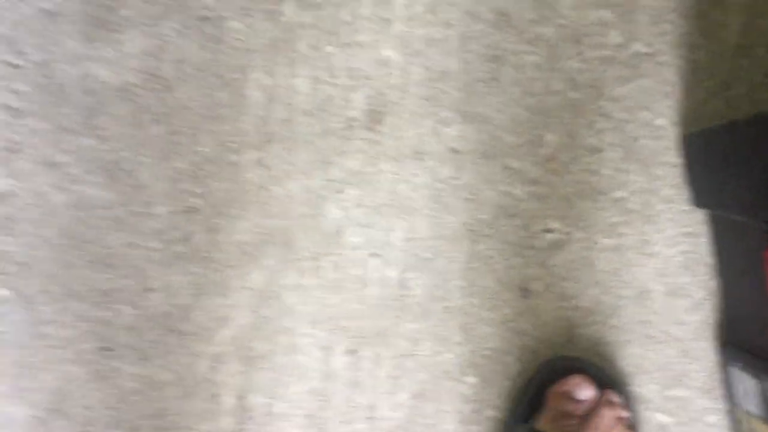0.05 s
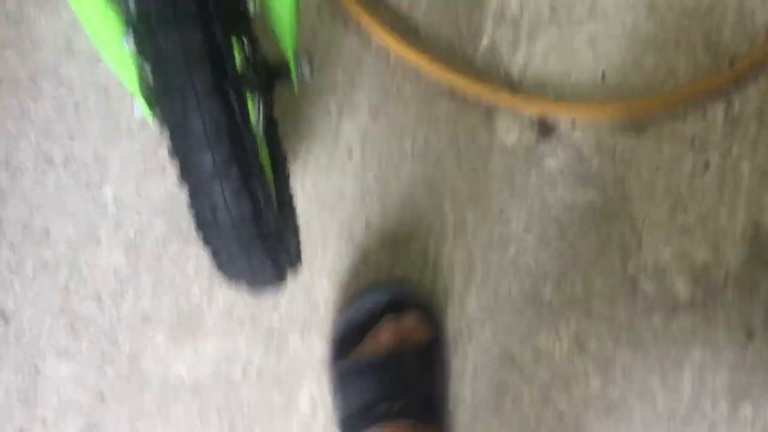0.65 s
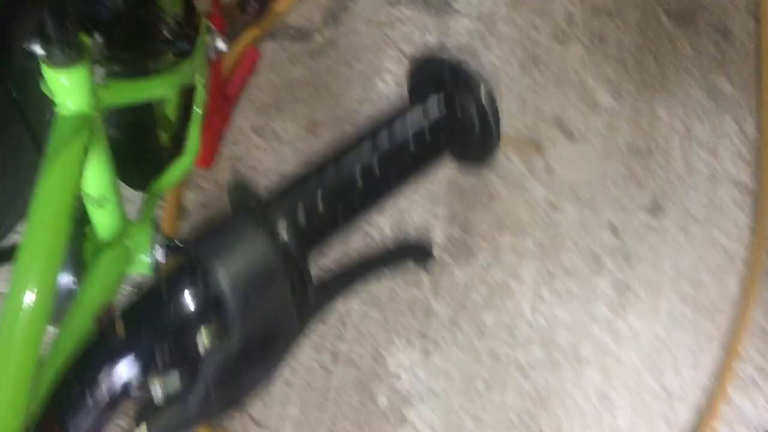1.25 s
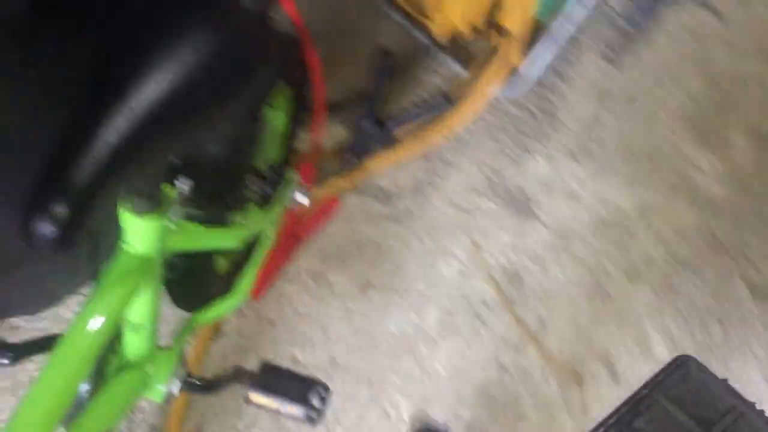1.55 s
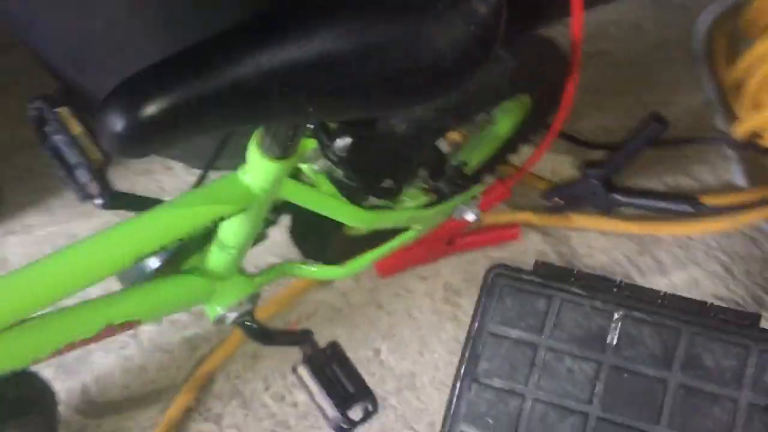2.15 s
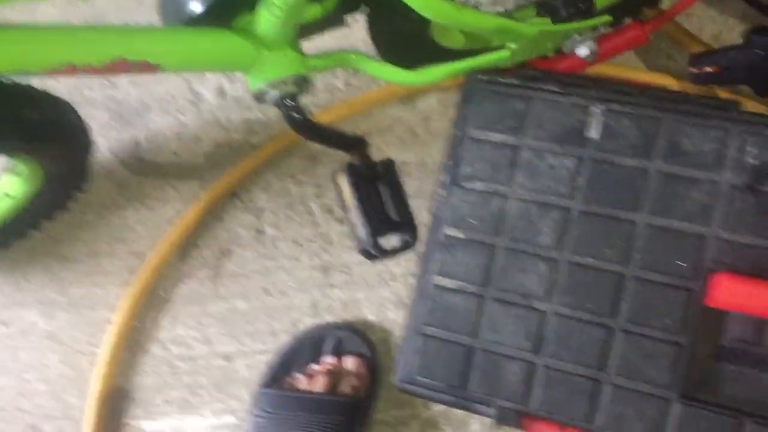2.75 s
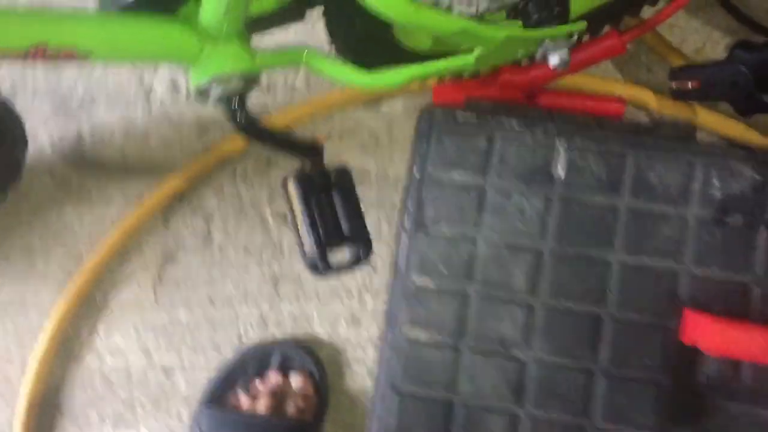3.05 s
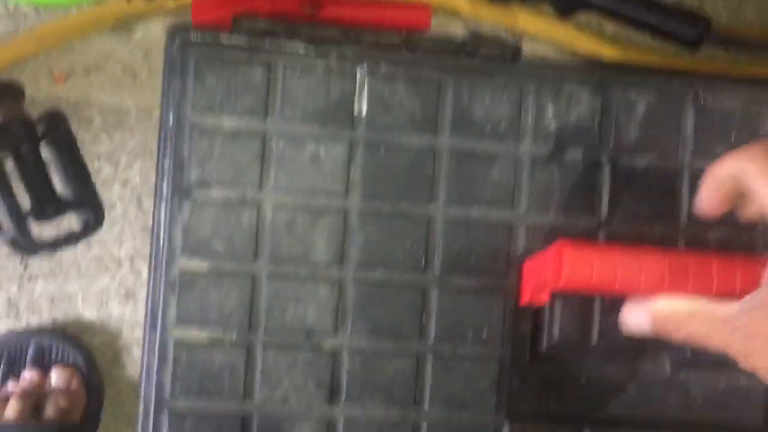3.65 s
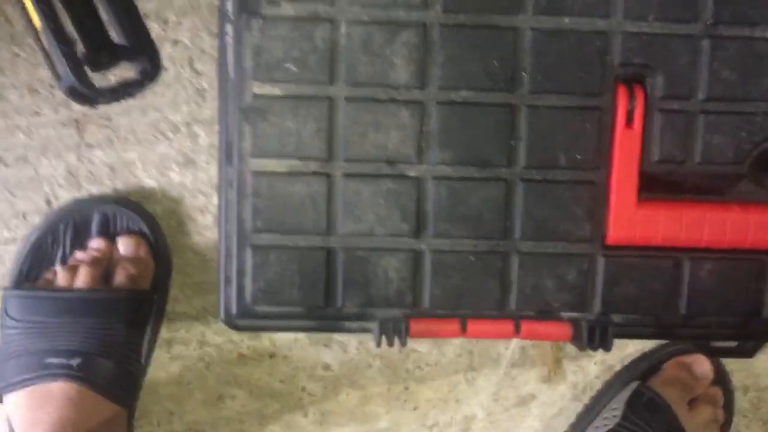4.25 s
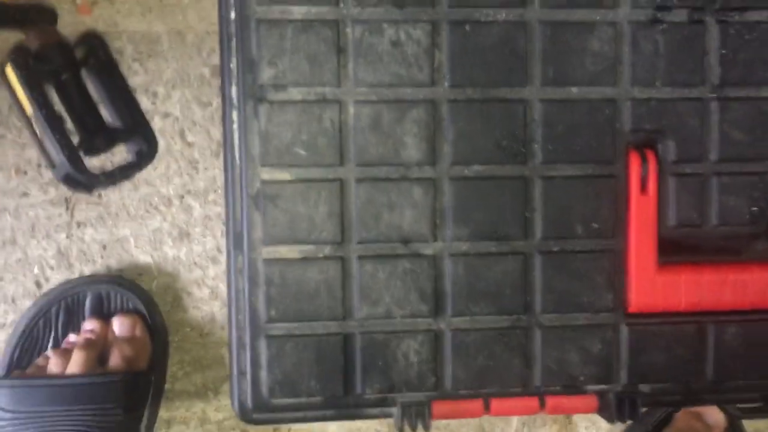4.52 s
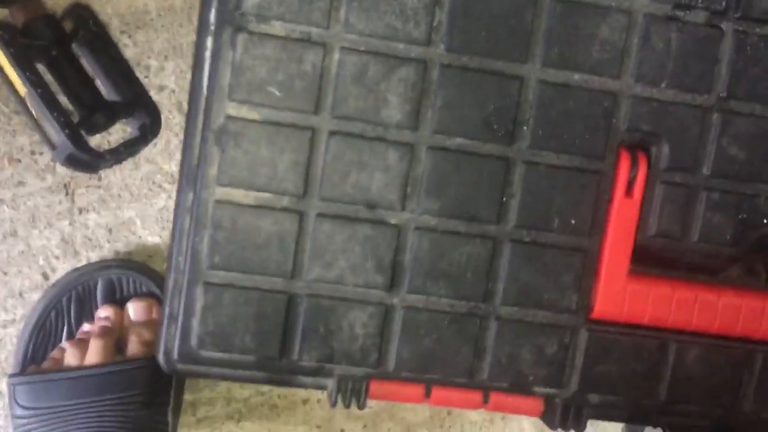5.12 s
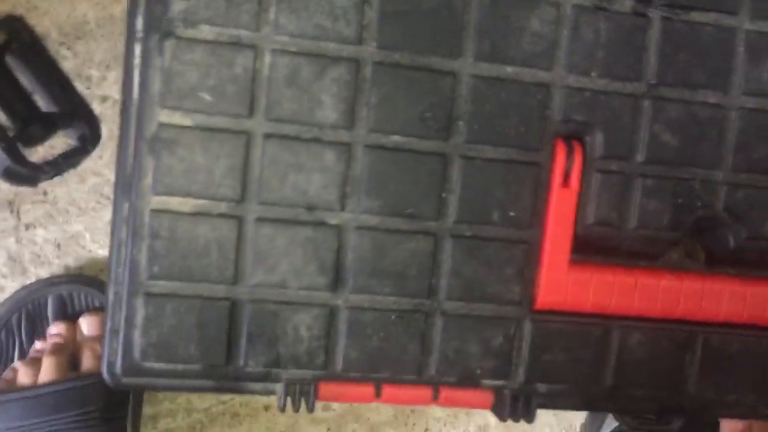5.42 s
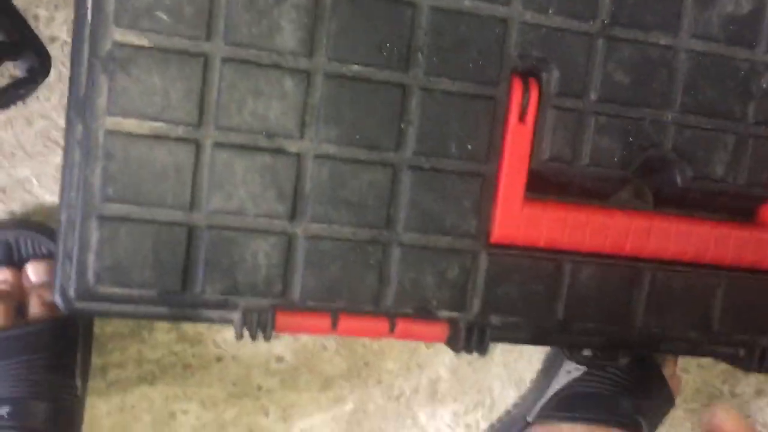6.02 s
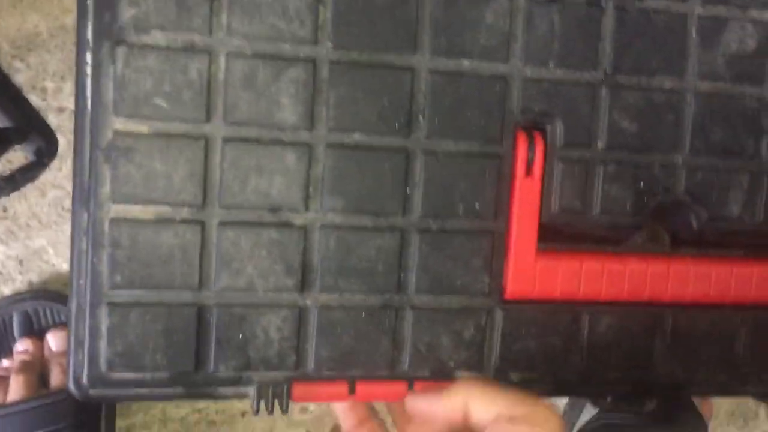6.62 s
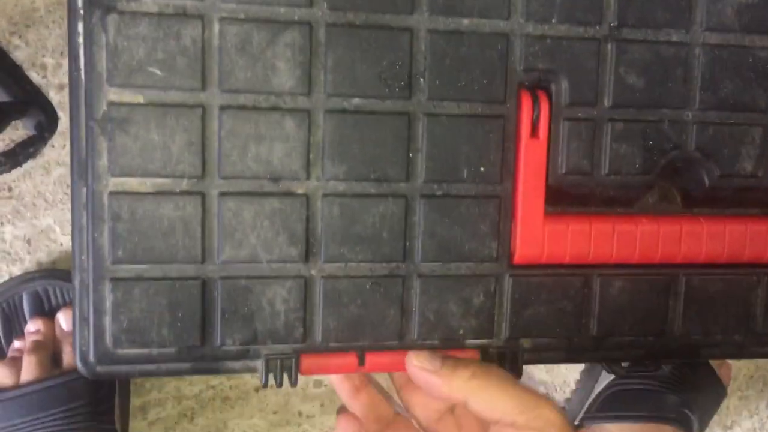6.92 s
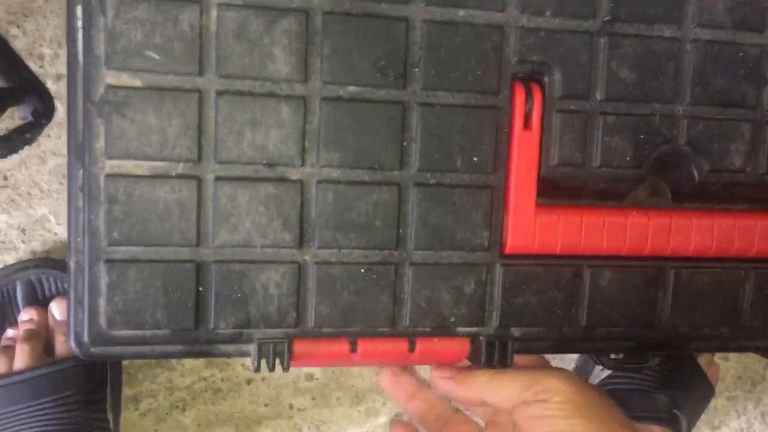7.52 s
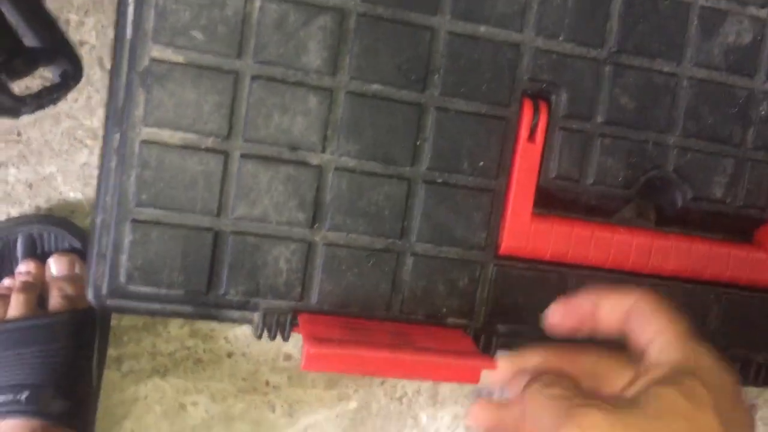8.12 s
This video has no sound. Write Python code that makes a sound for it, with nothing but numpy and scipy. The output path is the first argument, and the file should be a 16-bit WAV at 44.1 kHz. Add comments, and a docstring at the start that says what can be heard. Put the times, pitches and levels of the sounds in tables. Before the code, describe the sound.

Hollow knocks, scrapes and sharp clicks as a plastic box is shifted and its latch snapped, over a low garage hum.

```python
"""A plastic box holding a car battery is shifted on a garage floor; its handle drops and its latches snap.
Each impact excites the modes of the hollow shell and the reverberation of the small room; heavy ones also
thud on the floor and may shove the box. Hands and plastic rub, the shell creaks by stick-slip friction,
plastic squeaks briefly and lid panels pop. At first, sandals scuff across the concrete towards the box.
Underneath lie a low machine hum, a soft rumble and rustle, and the steady air of the garage."""
import sys
import numpy as np
from scipy import signal
from scipy.fft import rfft, irfft, next_fast_len
from scipy.io import wavfile
from scipy.ndimage import uniform_filter1d

SR = 44100
rng = np.random.default_rng(int(sys.argv[2]) if len(sys.argv) > 2 else 0)


def output_pcm(signal):
    """Save a mono or channel-first signal as 16-bit PCM at the path in sys.argv[1].

    Samples are clipped to [-1, 1] before scaling.
    """
    pcm = np.clip(np.atleast_2d(signal).T, -1, 1) * 32767
    wavfile.write(sys.argv[1], SR, np.round(pcm).astype(np.int16))


N = 369116
TIME = np.arange(N) / SR
AGE = np.arange(int(.4 * SR)) / SR  # time since an impact, s
ATTACK = int(.016 * SR)  # opening samples, which set the level of an impact

# The four registers of a contact, thump, body, clack and crisp edge: lower f/Hz, upper f/Hz.
# A contact's level is that of its thump; hardness is clack over thump, sharpness is edge over clack.
REGISTERS = [(90, 480), (480, 1050), (1050, 2600), (2600, 15500)]
# Hard blows on box, handle and latches: t/s, level/dB, hardness/dB, sharpness/dB
KNOCKS = [(2.771, -36.5, -12, -19), (2.945, -50.5, -10, -15), (3.021, -12.5, -13.5, -5),
          (3.067, -21, -20.5, -8.5), (3.304, -31, 3, -29), (3.317, -7, -3.5, -5), (3.4, -15.5, -7.5, -7.5),
          (3.441, -23, 2, -23.5), (3.552, -34, -19.5, 2.5), (3.59, -29.5, -15.5, -13.5),
          (3.993, -12, 2, -6.5), (4.066, -21.5, -1, -8.5), (4.325, -39, -12, -7), (4.354, -28, -16, -5.5),
          (5, -19.5, -18.5, -12.5), (5.014, -17, -8, -17), (5.06, -21, -13, -25), (5.565, -50, 5.5, -6.5),
          (5.603, -39, -0.5, -14), (5.757, -36.5, 2.5, -5), (5.767, -10.5, -13.5, -6),
          (5.828, -20, -16, -16.5), (6.041, -37.5, -13.5, 6), (6.057, -32.5, -9, -7.5),
          (6.268, -34, -0.5, -6), (6.359, -46, 4, -1.5), (6.395, -23.5, -11, -6.5),
          (6.725, -34.5, -11, -17.5), (6.761, -25, -30, -4.5), (6.777, -39.5, 15, -12),
          (6.944, -49.5, -4.5, 2), (7.103, -44.5, -1, -29.5), (7.169, -13.5, -8.5, -9.5),
          (7.564, -42.5, -13, -6.5), (7.718, -37.5, -8, -1), (8.053, -36.5, -1.5, -15),
          (8.083, -22, -18, -26.5), (8.105, -23.5, -13.5, -28)]
# Spectrum of a hard contact: f/Hz, relative level/dB
CONTACT_SPECTRUM = [(80, -8.5), (150, 9.5), (380, -4.5), (520, -16.5), (800, -15), (1600, 10), (2600, -5),
                    (4200, -2.5), (6500, -8), (9000, -11.5), (15000, -20.5)]
# Spectrum of sliding friction: f/Hz, relative level/dB
FRICTION_SPECTRUM = [(80, 7), (150, 15), (330, 7), (520, -12.5), (900, -8), (1550, 0.5), (2600, -7.5),
                     (4200, -8), (6400, -10.5), (8500, -17.5), (15000, -21.5)]


def undb(db):
    """Amplitude ratio of a level in decibels."""
    return 10 ** (np.asarray(db) / 20)


def unit(x, size=None):
    """Normalisation to rms 1, over the first samples if a size is given."""
    return x / np.sqrt(np.mean(x[:size] ** 2) + 1e-18)


def band(x, lo_hz, hi_hz, order=3):
    """Causal band-pass filter."""
    return signal.sosfilt(signal.butter(order, [lo_hz, hi_hz], "band", fs=SR, output="sos"), x)


def noise(spectrum, size):
    """Spectral shaping of white noise by rows of f/Hz, level/dB; the result has rms 1."""
    hz, db = np.transpose(spectrum)
    n = next_fast_len(size)
    bin_hz = np.arange(n // 2 + 1) * SR / n
    gain = undb(np.interp(np.log(bin_hz + 1), np.log(hz), db))
    return unit(irfft(rfft(rng.standard_normal(n)) * gain, n)[:size])


def wander(rate_hz):
    """Random modulation: ramps between values drawn at the given rate, with rms near 1."""
    hold = max(int(SR / rate_hz), 1)
    held = np.repeat(rng.standard_normal(N // hold + 1), hold)
    return unit(uniform_filter1d(held, hold))[:N]


def decay(t60):
    """Exponential decay of a damped vibration, 60 dB in t60 seconds."""
    return np.exp(-np.log(1000) * AGE / np.maximum(t60, 1e-3))


def pulse(rise_s):
    """Transient envelope that swells to 1 at rise_s and dies away."""
    return (AGE / rise_s * np.exp(1 - AGE / rise_s)) ** 2


def add(out, start, x):
    """Superposition of a sound at its start time in seconds."""
    i = max(int(start * SR), 0)
    out[i:i + len(x)] += x[:max(N - i, 0)]


def voiced(x, level, hardness, sharpness, body_db, size=None):
    """Band weighting of a contact; the body lies body_db from the midpoint of thump and clack."""
    levels = level + np.array([0, hardness / 2 + body_db, hardness, hardness + sharpness])
    return sum(undb(db) * unit(band(x, *edges), size) for db, edges in zip(levels, REGISTERS))


def heavy_blows(heavy_db=-20):
    """Blows above the threshold for moving the whole box: t/s, level/dB, hardness/dB."""
    return [(start, level, hardness) for start, level, hardness, _ in KNOCKS if level > heavy_db]


def air(level_db=-54):
    """Ambient noise: the air of the garage is stationary and broadband, strongest in the bass."""
    # Spectrum of the air: f/Hz, relative spectral density/dB
    air_spectrum = [(15, -43), (28, -12.5), (48, -2), (107, 2), (164, -15), (227, -12), (389, -30.5),
                    (523, -27), (762, -24), (848, -26.5), (1660, -32), (15500, -44.5)]
    return undb(level_db) * noise(air_spectrum, N)


def hum(hum_hz=62.5, overtone_hz=121, waver=0.043, throb_db=3, whine_hz=768.5, whine_db=-71):
    """Amplitude and frequency modulation: a machine drone throbs and wavers under a faint whine."""
    # Drone, varying with the place in the room: t/s, level/dB
    drone_levels = [(0.0, -64), (0.72, -43.5), (1.02, -64.5), (1.7, -56.5), (2.2, -47.5), (2.9, -39),
                    (3.7, -52.5), (4.7, -57.5), (5.3, -47.5), (6.0, -56), (6.9, -42), (8.15, -45.5),
                    (8.37, -64)]

    def tone(hz, drift):
        cycles = np.cumsum(hz * (1 + drift * wander(6))) / SR
        return np.sqrt(2) * np.sin(2 * np.pi * cycles)

    db = np.interp(TIME, *np.transpose(drone_levels)) + throb_db * wander(12)
    drone = tone(hum_hz, waver) + undb(-13 + 3 * wander(3)) * tone(overtone_hz, waver)
    nearness = 1 / (1 + ((TIME - 2.5) / 1.3) ** 2)  # the whine is loudest beside the box, at 2.5 s
    return undb(db) * drone + undb(whine_db) * tone(whine_hz, drift=0.004) * nearness


def handling(rumble_db=-2, rustle_db=-4, flutter_db=3, grain_db=3):
    """Structure-borne and friction noise: a hand rumbles on the phone and clothes rustle softly."""
    # Handling envelopes: t/s, relative rumble level/dB, relative rustle level/dB
    handling_levels = [(0.0, -53, -52), (0.7, -46, -53), (1.02, -80, -63), (3.079, -57, -69.5),
                       (3.5, -40.5, -59.5), (3.66, -61, -73), (4.8, -55.5, -70.5), (5.169, -47.5, -62),
                       (8.37, -49.5, -68.5)]
    times, low_db, high_db = np.transpose(handling_levels)
    rumble = band(rng.standard_normal(N), 84, 220, order=2) * undb(flutter_db * wander(7.4))
    rustle = band(noise(FRICTION_SPECTRUM, N), 700, 15000, order=2)
    rustle *= undb(flutter_db * wander(22) + grain_db * wander(450))
    return (unit(rumble) * undb(np.interp(TIME, times, low_db) + rumble_db)
            + unit(rustle) * undb(np.interp(TIME, times, high_db) + rustle_db))


def garage(x, room_db=-13, low_t60=0.3, mid_t60=0.22, high_t60=0.17, build_s=0.0038):
    """Reverberation: bare walls return a short diffuse tail that dies sooner in the treble."""
    white = rng.standard_normal(len(AGE))
    tail = (band(white, 88, 500) * decay(low_t60)
            + band(white, 350, 3000) * decay(mid_t60)
            + band(white, 3000, 18000) * decay(high_t60))
    tail *= 1 - np.exp(-(AGE / build_s) ** 2)
    return undb(room_db) * signal.fftconvolve(x, tail / np.linalg.norm(tail))[:N]


def steps(grit_t60=0.007, sole_t60=0.12, sole_db=-13, body_db=-3):
    """Damped impact: grit snaps under a sole, which gives a short dead tap."""
    # Sandals and grit on concrete: t/s, level/dB, hardness/dB, sharpness/dB
    taps = [(0.031, -33.5, -11.5, 0.5), (0.279, -64.5, 4, 13), (0.408, -36.5, -16, 12.5),
            (0.481, -45.5, 5.5, 2), (0.537, -58, 15.5, -11), (0.681, -22, -10.5, -15),
            (0.762, -54, 28, -8.5), (1.219, -63, 25.5, 3.5), (1.359, -65.5, 24, -31),
            (1.728, -58.5, 15, -10), (1.787, -54, 12, -30), (1.915, -56, 9, -12), (2.205, -67.5, 21, -6),
            (2.38, -46.5, 0.5, -22)]
    out = np.zeros(N)
    envelope = decay(grit_t60) + undb(sole_db) * decay(sole_t60)
    for start, *contact in taps:
        tap = noise(CONTACT_SPECTRUM, len(AGE)) * envelope
        add(out, start, voiced(tap, *contact, body_db, ATTACK))
    return out


def scrapes(grain_db=2, grain_hz=900, slip_db=2, slip_hz=110, patch_t60=0.028, patch_db=1):
    """Sliding friction: surfaces catch and slip as pressure rises and falls; each rubbed patch rings."""
    # Soles, hands and plastic sliding: peak t/s, duration/s, level/dB, hardness/dB, sharpness/dB
    rubs = [(0.045, 0.18, -43.5, -23, -4), (0.379, 0.17, -37.5, -15, -4.5),
            (0.435, 0.097, -27.5, -23.5, -3), (0.474, 0.08, -40.5, -3, -8), (0.664, 0.11, -29, -4, -14),
            (0.763, 0.024, -55.5, 30.5, -7.5), (0.8, 0.056, -46.5, 13.5, -4.5),
            (0.862, 0.29, -70, 19.5, -3.5), (1.246, 0.099, -66.5, 29, 3), (1.302, 0.23, -66.5, 9.5, 2),
            (1.482, 0.071, -72, 22.5, -6.5), (1.733, 0.026, -57.5, 14, -4.5),
            (1.775, 0.21, -68, 10.5, -5.5), (2.234, 0.085, -67, 25, 6), (2.313, 0.42, -68.5, 6, 3.5),
            (2.389, 0.13, -38.5, -8, -5), (2.481, 0.14, -39, -4.5, -6), (3.129, 0.091, -33, -19, -15),
            (3.332, 0.098, -23, -2, -10), (3.401, 0.088, -22.5, -3, -14.5), (3.474, 0.17, -38.5, -7, -16),
            (3.596, 0.093, -39.5, -22, 3), (3.932, 0.24, -39.5, -17, -3), (4.371, 0.06, -40, 3.5, -12.5),
            (5.078, 0.22, -30, -7, -13.5), (5.369, 0.044, -46, -2.5, -2.5), (5.532, 0.092, -44, -14.5, 1),
            (5.656, 0.036, -41.5, -14.5, -17), (6.041, 0.084, -42, -12.5, -7.5),
            (6.097, 0.045, -55.5, 4, 0), (6.169, 0.048, -39, -36, 15.5), (6.292, 0.051, -46.5, 14, -10),
            (6.311, 0.042, -40, 3, -9.5), (6.438, 0.11, -45, -4, -10), (6.622, 0.091, -56, 4.5, -9.5),
            (6.779, 0.055, -46.5, -6, -8), (7.029, 0.094, -58, -0.5, -8), (7.22, 0.072, -40, -20, 12),
            (7.743, 0.2, -39, -18, -6), (8.122, 0.087, -33.5, -22.5, -12)]
    rise_share, slide_s, blunt_db = 0.38, .12, -4.5
    # Heavy, blunt blows shove the box, adding rows of the same form.
    slides = [(start + rise_share * slide_s, slide_s, level - 18.5, -11, -9.5)
              for start, level, hardness in heavy_blows() if hardness < blunt_db]
    friction = noise(FRICTION_SPECTRUM, N)
    friction *= undb(grain_db * wander(grain_hz) + slip_db * wander(slip_hz))
    out = np.zeros(N)
    for peak, duration, *contact in rubs + slides:
        start = peak - rise_share * duration
        during = slice(*np.searchsorted(TIME, [start, start + duration]))
        pressure = np.interp(TIME[during], [start, peak, start + duration], [0, 1, 0])
        rub = friction[during] * pressure ** 1.12
        patch = band(rng.standard_normal(ATTACK), 990, 16000) * decay(patch_t60)[:ATTACK]
        ring = signal.fftconvolve(rub, patch / np.linalg.norm(patch))[:len(rub)]
        add(out, start, voiced(rub + undb(patch_db) * ring, *contact, body_db=-4))
    return out


def creak(start_s=4.89, end_s=5.52, level_db=-47.5, slip_hz=50, jitter=0.14, buzz_db=-15):
    """Stick-slip under load: nearly periodic slips ring one panel and buzz through the shell."""
    force = np.zeros(N)
    slip = pulse(rise_s=.0045)
    slip_time = start_s
    for gap_deviation, slip_db in rng.standard_normal((64, 2)):
        if slip_time < end_s:
            add(force, slip_time, undb(slip_db) * slip)
        slip_time += (1 + jitter * gap_deviation) / slip_hz
    force *= rng.standard_normal(N)
    shell = band(force, 1120, 1400) + undb(buzz_db) * band(force, 600, 2100, order=4)
    return undb(level_db) * shell / np.std(shell[(TIME > start_s) & (TIME < end_s)])


def squeak(drop_s=3.993, hz=1850, peak_db=-15, rise_s=0.0064, waver=.05):
    """Friction-excited oscillation: rubbing plastic swells to a chirp, cut off as the handle drops."""
    cycles = np.cumsum(hz * (1 + waver * wander(300))) / SR
    growth = np.exp(-abs(TIME - drop_s) / rise_s) * (TIME < drop_s)
    return undb(peak_db) * np.sin(2 * np.pi * cycles) * growth


def pops(rise_s=0.0029):
    """Snap-through buckling: a lid panel flips over and rings for a few cycles with a hollow pop."""
    # Panel flips: t/s, f/Hz, level/dB
    flips = [(6.042, 976, -25), (6.057, 903, -24), (6.24, 693, -16), (7.169, 723, -7.5)]
    partials = (1, 0), (.62, -8), (1.55, -17)  # frequency ratio, relative level/dB
    out = np.zeros(N)
    for start, hz, level in flips:
        ring = sum(undb(db) * np.sin(2 * np.pi * ratio * hz * AGE) for ratio, db in partials)
        add(out, start, undb(level) * ring * pulse(rise_s))
    return out


def thuds():
    """Free vibration: the weight of the battery lands on the floor and shakes the bottom of the box."""
    # Modes of the thud: f/Hz, level relative to the blow/dB, t60/s
    thud_modes = [(56, -19.5, 0.11), (115, -11, .16)]
    thud = sum(undb(db) * np.sin(2 * np.pi * hz * AGE) * decay(t60) for hz, db, t60 in thud_modes)
    out = np.zeros(N)
    for start, level, _ in heavy_blows():
        add(out, start, undb(level) * thud)
    return out


def knocks(crack_t60=0.031, crack_db=3, shell_t60=.085, shell_db=-8, mode_db=-6,
           spot_octaves=.8, scatter_db=1.8, detune=0.013, body_db=-2):
    """Modal response to impact: a contact cracks, then a few strong modes ring among many weak ones."""
    # Modes of the plastic shell: f/Hz, relative level/dB, t60/s
    shell_modes = [(125, 6, 0.22), (167.3, 3, 0.081), (217, 1, 0.091), (256, -1.5, 0.13), (318.6, 0, 0.13),
                   (373, -5.5, 0.037), (420, 3, 0.06), (634, -3.5, 0.079), (702, -0.5, 0.084),
                   (812, 5.5, 0.033), (925, -9, 0.14), (1120, -15, 0.03), (1214, -8.5, 0.046),
                   (1223, -7, 0.099), (1504, -11, 0.069), (1575, -1.5, 0.045), (1684, -2.5, 0.057),
                   (1957, -6.5, 0.074), (2230, -16.5, 0.043), (2670, -9.5, 0.052), (3340, -12, 0.081),
                   (3900, -19.5, 0.06), (4600, -15, 0.013), (6300, -5, 0.046)]
    # Soft, dull bumps against the shell: t/s, level/dB
    bumps = [(2.646, -37.5), (2.807, -39), (4.654, -43.5), (4.85, -36), (5.384, -34), (5.714, -36),
             (7.296, -33.5), (7.365, -31), (8.028, -29)]
    # The hands move from handle to lid edge, favouring lower modes: t/s, f/Hz favoured by a 0 dB blow
    strike_spots = [(3.0, 335.5), (4.2, 305.5), (5.0, 233.5), (8.3, 235.5)]
    hz, db, t60 = np.transpose(shell_modes)
    is_thump = hz < REGISTERS[0][1]
    soft_blows = [(start, level, -29.5, -13) for start, level in bumps]  # columns as in KNOCKS
    out = np.zeros(N)
    for start, level, hardness, sharpness in KNOCKS + soft_blows:
        # Stronger blows favour higher wall modes; harder ones ring for less time.
        spot_hz = np.interp(start, *np.transpose(strike_spots)) * 2 ** (level / 67.5)
        ring_scale = min(2 ** (-hardness / 28), 1)
        coupling = np.where(is_thump, np.exp(-(np.log2(hz / spot_hz) / spot_octaves) ** 2), 1)
        gain = undb(db + scatter_db * rng.standard_normal(len(hz))) * coupling
        gain *= rng.choice([-1, 1], len(hz))
        mode_hz = hz * (1 + detune * rng.standard_normal(len(hz)))
        modes = gain @ (np.sin(2 * np.pi * mode_hz[:, None] * AGE) * decay(ring_scale * t60[:, None]))
        # Noise stands for the crack and the dense weak modes.
        envelope = undb(crack_db) * decay(crack_t60) + undb(shell_db) * decay(ring_scale * shell_t60)
        blow = undb(mode_db) * modes + noise(CONTACT_SPECTRUM, len(AGE)) * envelope
        add(out, start, voiced(blow, level, hardness, sharpness, body_db, ATTACK))
    return out


def scene():
    """Direct and reverberant sound: box close by, feet further off and more reverberant, over the hum."""
    box = knocks() + creak() + squeak() + pops()
    feet, sliding = steps(), scrapes()
    walls = garage(box + undb(3.5) * feet + undb(-5) * sliding)
    return (box + thuds() + feet + sliding + walls + hum() + handling() + air())[None]


def record(dry, cutoff_hz=16000):
    """Overload and band limiting: the hardest snaps clip, and a steep low-pass cuts the top."""
    low_pass = signal.ellip(10, .2, 70, cutoff_hz, fs=SR, output="sos")
    return signal.sosfilt(low_pass, np.clip(dry, -1, 1))


dry = scene()
out = record(dry)
output_pcm(out)
```